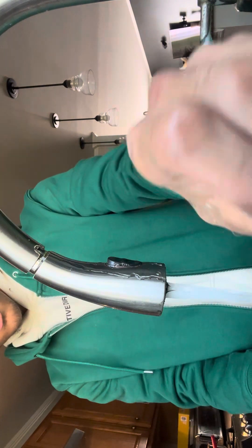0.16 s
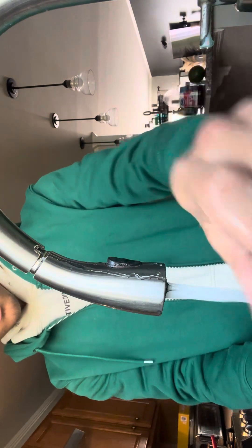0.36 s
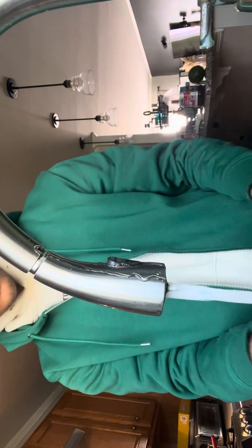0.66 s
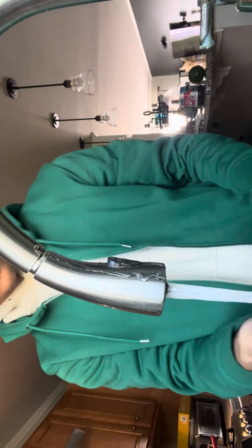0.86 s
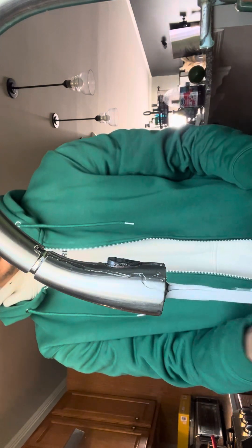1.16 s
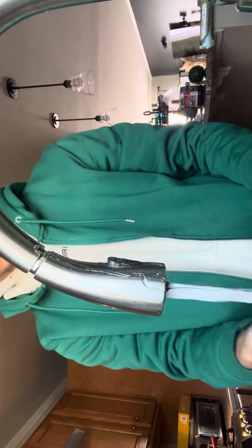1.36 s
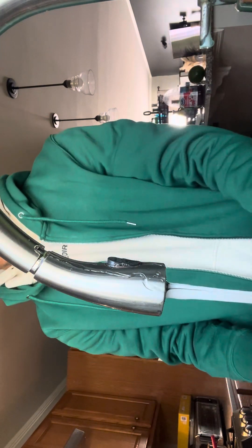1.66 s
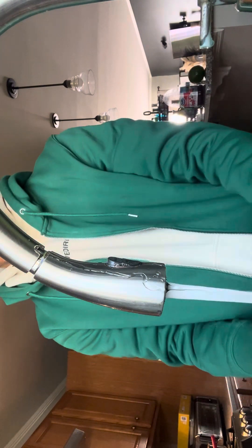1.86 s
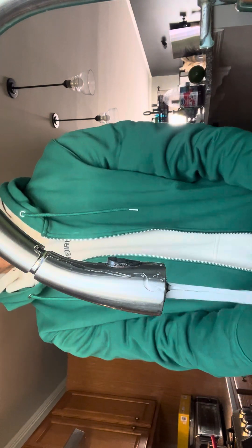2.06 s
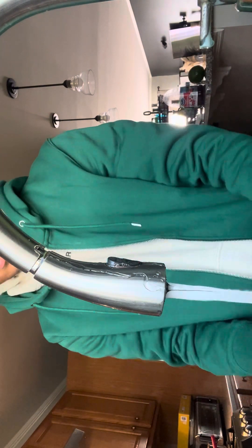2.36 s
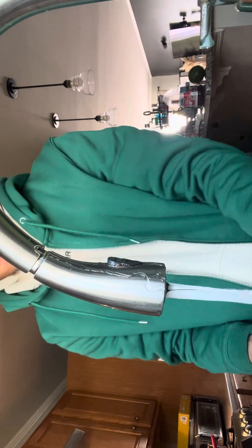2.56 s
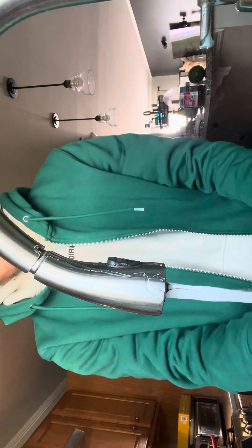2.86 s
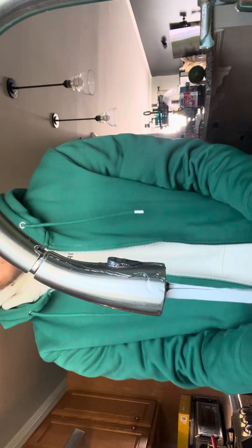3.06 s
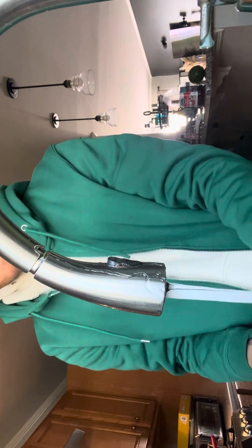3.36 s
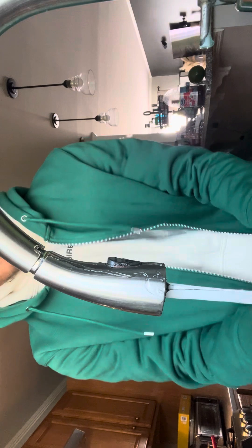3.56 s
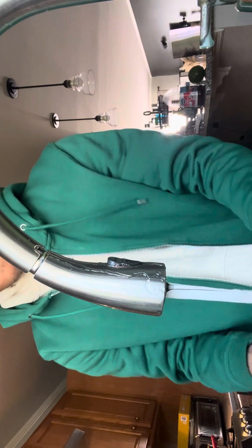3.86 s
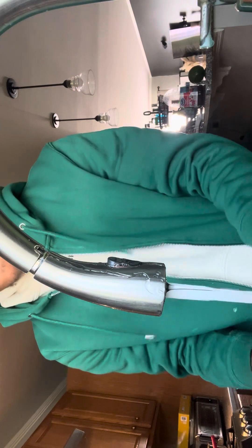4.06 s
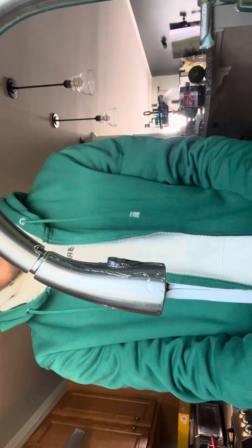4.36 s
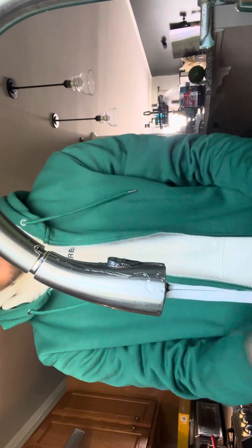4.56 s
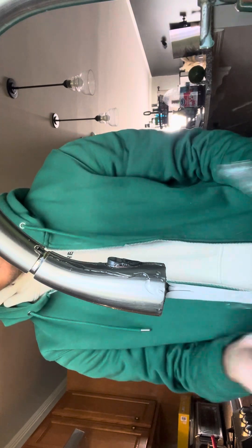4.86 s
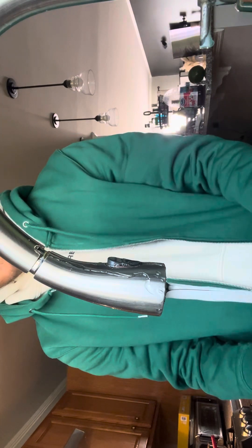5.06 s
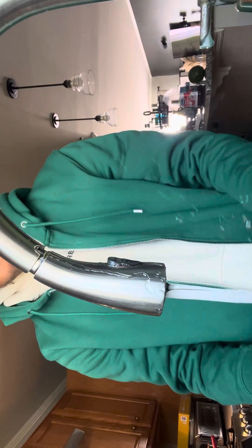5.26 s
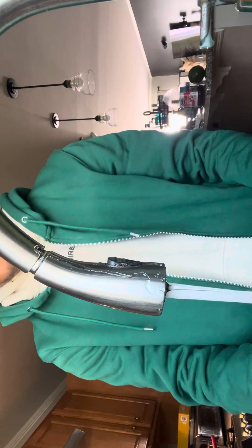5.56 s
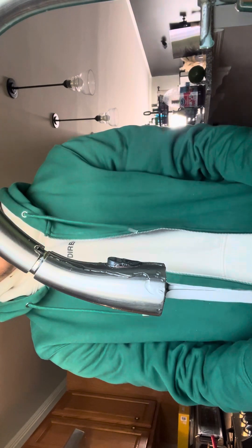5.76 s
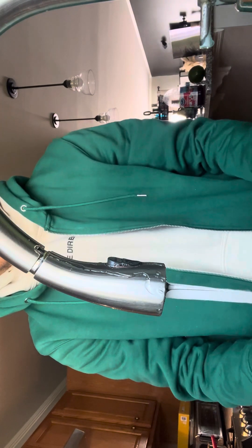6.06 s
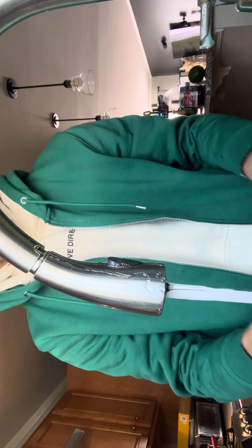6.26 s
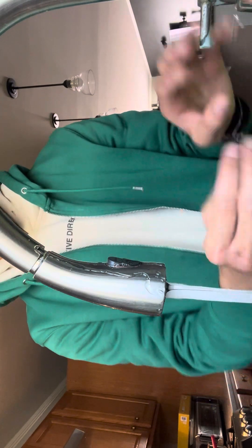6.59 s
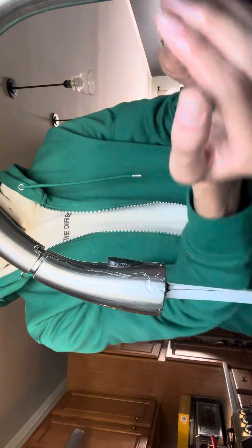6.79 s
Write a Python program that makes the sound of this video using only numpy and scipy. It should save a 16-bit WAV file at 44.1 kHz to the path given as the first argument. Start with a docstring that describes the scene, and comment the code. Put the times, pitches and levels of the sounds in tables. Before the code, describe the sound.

Close, crisp tap water patters and fizzes on a metal basin, broken by hand splashes, watery plops and dull hollow thumps midway.

```python
"""In a kitchen, a tap runs into a steel sink while hands are rubbed under it.
The stream patters, fizzes and drums on the basin: random impacts drive bands, air bubbles and steel modes.
The hands throw off splashes and let go gulps of water that thump on the bottom: timed bursts and rings.
Two microphone ports listen from beside the spout, over a low room rumble."""
import sys
import numpy as np
from scipy import signal
from scipy.fft import rfft, irfft, next_fast_len
from scipy.io import wavfile

SR = 44100
rng = np.random.default_rng(int(sys.argv[2]) if len(sys.argv) > 2 else 0)


def waveform_to_disk(signal):
    """Save audio, clipped to [-1, 1], as 16-bit WAV at the path in sys.argv[1]."""
    frames = np.transpose(np.atleast_2d(signal))
    scaled = np.clip(frames, -1, 1) * 32767
    samples = np.round(scaled).astype(np.int16)
    wavfile.write(sys.argv[1], SR, samples)


N = 305613
TIME = np.arange(N) / SR
FFT_SIZE = next_fast_len(N + 4096)
DIRECT_ONLY = np.array([[1], [0]])   # layers have two rows: direct sound, scattered sound


def from_db(db):
    """Decibels to gain."""
    return 10 ** (np.asarray(db) / 20)


def rms_one(x):
    """Scale to unit power."""
    return x / np.sqrt(np.mean(x ** 2) + 1e-20)


def on_bins(rows):
    """Read each column of a table by frequency at every FFT bin, along a log frequency axis."""
    hz, *columns = np.transpose(rows)
    bins = np.log(np.maximum(np.fft.rfftfreq(FFT_SIZE, 1 / SR), 1))
    return [np.interp(bins, np.log(hz), column) for column in columns]


def colour(x, spectrum):
    """Shape a signal with a smooth spectrum; rms 1."""
    gain = from_db(on_bins(spectrum)[0])
    return rms_one(irfft(rfft(x, FFT_SIZE) * gain, FFT_SIZE)[..., :N])


def droplets(per_s, spread_db):
    """Two unrelated trains of uneven impacts: one heard directly, one scattered round the basin."""
    sizes = from_db(spread_db * np.minimum(rng.exponential(1, (2, N)), 4.5))
    signs = rng.choice([-1, 1], (2, N))
    landed = rng.random((2, N)) < per_s / SR
    return rms_one(sizes * signs * landed)


def spurts(per_s, decay_s):
    """Power of clumps of water that land at once and die away; mean 1."""
    landings = (rng.random(N) < per_s / SR) * rng.exponential(1, N) ** 2.45
    power = signal.lfilter([1], [1, -np.exp(-1 / (decay_s * SR))], landings + 1e-18)
    return power / power.mean()


def resonate(x, hz, width_hz):
    """A two-pole resonance with gain 1 on top."""
    r = np.exp(-np.pi * width_hz / SR)
    zeros = np.array([1, 0, -1]) * (1 - r * r) / 2
    poles = [1, -2 * r * np.cos(2 * np.pi * hz / SR), r * r]
    return signal.lfilter(zeros, poles, x + 1e-18)


def basin(x, modes):
    """Impacts ring a set of modes in parallel, with alternating polarity; rms 1."""
    return rms_one(sum((-1) ** k * from_db(db) * resonate(x, hz, width)
                       for k, (hz, width, db) in enumerate(modes)))


def bursts(rows, rise_s):
    """Envelope of events (time [s], level [dB], decay [s]) that swell quickly and die away."""
    out = np.zeros(N)
    for s, db, decay_s in rows:
        part = out[int(s * SR):][:SR // 2]
        age = TIME[:len(part)]
        part += from_db(db) * (1 - np.exp(-age / rise_s)) * np.exp(-age / decay_s)
    return out


def rings(rows, rise_s, glide=0):
    """Damped sines (time [s], level [dB], pitch [Hz], t60 [s]); glide is the relative pitch rise per second."""
    out = np.zeros(N)
    for s, db, hz, t60 in rows:
        part = out[int(s * SR):][:SR // 2]
        age = TIME[:len(part)]
        swing = np.sin(2 * np.pi * hz * age * (1 + glide * age / 2))
        part += from_db(db - 60 * age / t60) * (1 - np.exp(-age / rise_s)) * swing
    return out


def over_stream(steady_db, gain):
    """Level in dB of the steady stream and an added layer, summed as powers."""
    return 20 * np.log10(np.hypot(from_db(steady_db), gain))


WANDER_PER_S = 18   # new random levels per second


def wander(spread_db):
    """The water lands unevenly: a random swing of level in dB, gliding from value to value."""
    knots = rng.standard_normal(1024)
    return spread_db * np.interp(TIME * WANDER_PER_S, np.arange(len(knots)), knots)


# tone of the room rumble: (frequency [Hz], relative level [dB])
RUMBLE_TONE = [(20, -3), (40, -0.5), (65, 6), (110, -3.5), (200, -8.5), (600, -18), (3000, -50)]
RUMBLE_DB = -52


def room_rumble():
    """The room rumbles steadily: noise weighted to the lows."""
    return from_db(RUMBLE_DB) * colour(rng.standard_normal((2, N)), RUMBLE_TONE)


# rumbles after the heaviest knocks: (time [s], level [dB], decay [s])
CABINET_RUMBLES = [(3.995, -34, 0.053), (4.085, -38.5, 0.074), (4.44, -46, 0.063)]
# their tone: (frequency [Hz], relative level [dB])
CABINET_TONE = [(20, -10), (45, 1), (70, 1), (110, -6), (250, -6.5), (350, -12), (600, -33), (2000, -60)]


def cabinet():
    """A deep, uneven rumble follows the heaviest knocks: bursts of low noise."""
    return bursts(CABINET_RUMBLES, rise_s=.008) * colour(rng.standard_normal((2, N)), CABINET_TONE)


GULPS_PER_S, GULP_DB, GULP_CYCLES = 20, -9.5, 10   # level against the gurgle before its trim


def gulps(level_db, count=10):
    """Pockets of air break one by one in the pool, each ringing at the pitch of its size."""
    born = droplets(per_s=GULPS_PER_S, spread_db=0.0)
    dealt = rng.integers(0, count, N)   # deals each pocket a pitch
    pockets = sum(resonate(born * (dealt == k), hz, hz / GULP_CYCLES)
                  for k, hz in enumerate(np.geomspace(430, 640, count)))
    return from_db(level_db + GULP_DB) * rms_one(pockets)


# mid modes of the steel, air pockets in the pooled water, low modes of the bottom:
# (frequency [Hz], width [Hz], relative level [dB])
RING_MODES = [(818, 106, -3.5), (1003, 200, -4), (1098, 104, 2.5), (1240, 68, 4), (1612, 46, 6.5),
              (1734, 37, 8), (1960.5, 36, 8.5), (2103, 7.5, 8), (2278, 21, 3.5)]
POCKET_MODES = [(418, 41, -3.5), (517.4, 24, -1), (581, 18.5, 3), (707, 11.7, 0), (1070, 310, -12)]
DRUM_MODES = [(59.3, 28, -8), (90.7, 16, -0.5), (122, 10, 7), (168.5, 11.4, 0.5), (234.4, 32.6, -3.5),
              (325.4, 21, -7.5), (398, 55, -12)]


def drumming(ring_db, gurgle_db, drum_db):
    """The falling water keeps the basin ringing and rumbling; lumps of water make the pool gurgle."""
    ring = from_db(ring_db + 2.0) * basin(droplets(per_s=900, spread_db=1.5), RING_MODES)
    gurgle = from_db(gurgle_db - 1.5) * basin(droplets(per_s=300, spread_db=3.0), POCKET_MODES)
    drum = from_db(drum_db - 3.5) * basin(droplets(per_s=600, spread_db=3.5), DRUM_MODES)
    return ring + gurgle + gulps(gurgle_db) + drum


# large air pockets: (time [s], level before trim [dB], starting pitch [Hz])
PLOPS = [(3.287, -27.5, 513), (3.436, -30, 550), (3.491, -27.5, 520), (3.626, -25, 530), (4.503, -36, 500),
         (5.408, -28.5, 506), (5.493, -37, 493), (5.508, -42, 540), (5.642, -31.5, 517), (5.797, -34, 515)]
PLOP_T60_S, PLOP_GLIDE_PER_S = .042, 2.0
CHURN_DB, CHURN_HZ, CHURN_WIDTH_HZ = -8.5, 520, 126   # level against the untrimmed plop
# handfuls of water that slop into the pool: (time [s], level [dB], decay [s])
SLOPS = [(1.035, -41, 0.058), (1.088, -45, .015), (3.289, -50, 0.013), (3.764, -46, .02),
         (5.782, -38, 0.039), (5.835, -56, 0.027), (6.097, -40, 0.035), (6.825, -43, 0.024),
         (6.901, -37.5, 0.033)]
# dull wash of the slopping water: (frequency [Hz], relative level [dB])
WASH_TONE = [(150, -11), (400, 1), (560, 2), (680, -6.5), (850, 1), (1150, -3), (1450, -2), (4000, -32)]


def pool():
    """Water slops into the pool; trapped air plops, rising in pitch, inside a churn of smaller pockets."""
    plops = rings([(s, db, hz, PLOP_T60_S) for s, db, hz in PLOPS], rise_s=0.0056, glide=PLOP_GLIDE_PER_S)
    small_pockets = colour(droplets(per_s=900, spread_db=2.0), WASH_TONE)
    churn = rms_one(resonate(small_pockets, CHURN_HZ, CHURN_WIDTH_HZ))
    churning = bursts([(s, db + CHURN_DB, .014) for s, db, hz in PLOPS], rise_s=0.0053)
    washing = bursts(SLOPS, rise_s=0.0028) * colour(droplets(per_s=1500, spread_db=1.5), WASH_TONE)
    return from_db(4.0) * plops * DIRECT_ONLY + churning * churn + washing


# single fat drops on the steel: (time [s], level before ping trim [dB], starting pitch [Hz])
DROPS = [(0.686, -22.5, 1202), (1.215, -16, 1234), (1.519, -7.5, 1240), (1.534, -13, 1190),
         (1.875, -24.5, 1200), (3.308, -25, 1360), (3.436, -23, 1250), (3.737, -21, 1160),
         (6.097, -23, 1275)]
SPATTER_DB, SPATTER_DECAY_S, SPATTER_WIDTH_HZ = -12, 0.012, 320   # level against the untrimmed drop
DROP_PLOP_DB, DROP_PLOP_HZ, DROP_PLOP_WIDTH_HZ = -18, 593, 200   # dull plop within the spatter


def fat_drops(t60=0.051):
    """Fat drops ping on the steel, rising in pitch, and burst into spatter that rings near that pitch."""
    pings = rings([(s, db, hz, t60) for s, db, hz in DROPS], rise_s=0.0023, glide=4.8)
    train = droplets(per_s=4400, spread_db=-2.5)
    plop_train = droplets(per_s=1500, spread_db=-4.0)
    plop = from_db(DROP_PLOP_DB) * rms_one(resonate(plop_train, DROP_PLOP_HZ, DROP_PLOP_WIDTH_HZ))
    spatter = 0
    for s, db, hz in DROPS:
        once = resonate(train, hz, SPATTER_WIDTH_HZ)
        pitched = rms_one(resonate(once, hz, SPATTER_WIDTH_HZ))
        spatter = spatter + bursts([(s, db + SPATTER_DB, SPATTER_DECAY_S)], rise_s=0.0098) * (pitched + plop)
    return spatter + from_db(-6.5) * pings * DIRECT_ONLY


# gulps of water and knocks on the basin:
# (time [s], boom level [dB], boom pitch [Hz], boom t60 [s], slap level [dB])
THUMPS = [(1.531, -31, 125, .08, -38), (1.547, -25, 122, 0.26, -38), (1.545, -36, 58.6, 0.23, -41),
          (3.376, -32, 147, 0.19, -43), (3.436, -33, 135, 0.16, -49), (3.963, -23, 240, 0.069, -28),
          (3.972, -44, 725, 0.17, -45), (3.984, -15.5, 96.3, 0.13, -36.5), (4.041, -41, 288, 0.28, -41.5),
          (4.076, -31.5, 65.4, 0.47, -48), (4.234, -33, 132.5, .25, -50), (4.262, -37, 200, .2, -44),
          (4.381, -35, 1070, 0.06, -39), (4.388, -33, 201, .1, -34), (4.396, -29, 742, 0.066, -44),
          (4.438, -35, 90, 0.25, -47), (6.823, -33, 500, 0.054, -40), (6.9, -27, 460, 0.049, -40)]
# hollow body of the basin: (frequency [Hz], level against the slap [dB], t60 [s])
BODY_MODES = [(122, -13.5, 0.43), (249, -16, 0.52), (332.4, -4, 0.12), (490, -21, 0.36), (672, -7.5, 0.23),
              (788, -12, 0.36)]


def thumps(slap_s=0.02):
    """Heavy blows slap the basin wetly, make the bottom boom and ring its hollow body."""
    booms = rings([row[:4] for row in THUMPS], rise_s=0.0011)
    body = rings([(s, slap_db + db, hz, t60) for s, *_, slap_db in THUMPS for hz, db, t60 in BODY_MODES],
                 rise_s=.003)
    slap_tone = [(60, -4), (170, 6.0), (320, 13.5), (600, 3.0), (1100, 3), (1700, -24), (6000, -33)]
    wet = colour(droplets(per_s=1900, spread_db=-1.0), slap_tone)
    slaps = wet * bursts([(s, slap_db, slap_s) for s, *_, slap_db in THUMPS], rise_s=0.0059)
    return slaps + (booms + body) * DIRECT_ONLY


# tone of the small bubbles: (frequency [Hz], relative level [dB])
BUBBLE_TONE = [(1800, -13), (2400, 6), (2750, 11.5), (3500, 3.5), (4500, 5), (6000, -7.5), (8000, -41)]


def bubbling(level_db, cycles=30, count=44):
    """Trapped air rings for a few cycles, each bubble at one of many pitches."""
    born = droplets(per_s=550, spread_db=1.5)
    dealt = rng.integers(0, count, N)   # deals each bubble a pitch
    fizz = sum(resonate(born * (dealt == k), hz, hz / cycles) / np.sqrt(hz)
               for k, hz in enumerate(np.geomspace(1900, 7500, count)))
    return from_db(level_db - 2.5) * colour(fizz, BUBBLE_TONE)


# large single bubbles: (time [s], level before trims [dB], starting pitch [Hz])
BLIPS = [(1.527, -34, 3580), (3.422, -38, 3820), (3.497, -40, 4000), (4.497, -34, 2090), (4.514, -36, 1730),
         (4.52, -37, 2200), (5.001, -39, 4400), (5.02, -40.5, 2080), (5.028, -41, 2350), (5.052, -42, 3410),
         (5.089, -49, 2640), (5.122, -37, 3620), (5.425, -37, 2340), (6.199, -33, 2360), (6.386, -43, 3520),
         (6.637, -46, 3670), (6.767, -40.5, 3460)]


def blips(t60=0.077):
    """Large bubbles chirp upward as they reach the surface, and break with a little fizz."""
    chirps = rings([(s, db, hz, t60) for s, db, hz in BLIPS], rise_s=0.00026, glide=0.99)
    breaking = bursts([(s, db, .008) for s, db, hz in BLIPS], rise_s=0.00057)
    fizz = colour(droplets(per_s=23000, spread_db=-2.0), BUBBLE_TONE) * breaking
    return from_db(12.5) * chirps * DIRECT_ONLY + from_db(3.5) * fizz


# lone drops that snap on bare steel: (time [s], level [dB], pitch [Hz])
SNAPS = [(1.5275, -11.5, 3650), (1.5105, -21, 4140), (1.538, -15, 3730), (2.314, -20, 6440),
         (2.3254, -11.5, 6170), (4.917, -16, 6500), (4.9045, -21, 6300), (4.979, -24, 5200),
         (5.0035, -21, 4330), (5.055, -20, 3600), (5.075, -18, 6300), (5.123, -11, 3700),
         (5.5727, -12.5, 6400), (5.8, -11.5, 6100), (6.405, -7, 6560), (6.521, -20, 3670),
         (.0635, -16, 6200), (.384, -23, 6300), (3.933, -22, 4700), (6.558, -13, 6600), (6.659, -13, 6500),
         (6.879, -20, 6200)]
SNAP_T60_S = 0.0074
CRACKLE_DB, CRACKLE_PER_S = -5.5, 230   # small random snaps, level against the spray before its trim
# tone of coarse drops: (frequency [Hz], relative level [dB])
SHOWER_TONE = [(150, -14), (700, -25), (2300, -3), (3500, -8.5), (5000, -4), (6500, 2), (7300, 4.5),
               (8600, -2), (10000, -34), (12000, -3), (15800, -29)]


def crackle(level_db, cycles=13, count=18):
    """Single drops snap on the steel with a brief pitched ring: a few loud ones, many small."""
    born = droplets(per_s=CRACKLE_PER_S, spread_db=2.0)
    dealt = rng.integers(0, count, N)   # deals each snap a pitch
    small = sum(resonate(born * (dealt == k), hz, hz / cycles) / hz
                for k, hz in enumerate(np.geomspace(3100, 7000, count)))
    loud = rings([(s, db, hz, SNAP_T60_S) for s, db, hz in SNAPS], rise_s=0.00031)
    return from_db(level_db + CRACKLE_DB) * colour(small, SHOWER_TONE) + loud * DIRECT_ONLY


# water flung off the hands: (time [s], level before trim [dB])
SPLASHES = [(.062, -27.5), (0.114, -19), (.143, -33), (0.178, -19.5), (0.195, -21), (0.232, -20),
            (0.334, -18), (0.354, -19), (.381, -20), (.407, -26), (.665, -26), (.758, -23), (0.878, -28),
            (1.128, -19), (1.268, -22.5), (1.302, -19.5), (1.462, -16), (1.509, -16.5), (1.5269, -18),
            (1.623, -25), (1.767, -22.5), (1.935, -32), (1.966, -22), (2.029, -17.5), (2.054, -22.5),
            (2.324, -16.5), (2.398, -19), (2.782, -24), (2.829, -19.5), (3.143, -22), (3.16, -31),
            (3.23, -25), (3.423, -24), (3.54, -19.5), (3.6, -25), (3.831, -25), (3.877, -18.5), (3.92, -27),
            (4.262, -15), (4.277, -24), (4.382, -24), (4.543, -17), (4.582, -21), (4.9055, -20.5),
            (4.914, -15), (4.9776, -19), (5.0025, -19.5), (5.053, -32), (5.13, -33), (5.277, -26),
            (5.388, -24), (5.408, -17), (5.485, -24), (5.499, -20.5), (5.57, -20), (5.605, -23),
            (5.656, -22), (5.672, -19), (5.731, -22.5), (5.79, -22.5), (5.899, -24), (5.931, -24),
            (5.962, -21), (5.988, -20), (6.015, -21), (6.059, -19.5), (6.095, -27), (6.108, -22),
            (6.152, -18), (6.2, -21), (6.217, -21), (6.306, -22.5), (6.385, -13.5), (6.518, -17),
            (6.54, -21), (6.555, -23), (6.637, -16.5), (6.654, -24), (6.72, -22), (6.73, -20), (6.765, -23),
            (6.805, -18), (6.84, -20)]
SPLASH_DECAY_S = 0.0091
# bright resonances of the basin and spout: (frequency [Hz], width [Hz], relative level [dB])
BRIGHT_MODES = [(3436, 32, 16), (3580, 230, 9.5), (4580, 280, 7.5), (6190, 410, 14.5), (6400, 78, 5)]


def splashes():
    """A sheet of water bursts into a short, dense shower that sets the bright resonances ringing."""
    shower = colour(droplets(per_s=7000, spread_db=1.5), SHOWER_TONE)
    ringing = basin(droplets(per_s=9000, spread_db=7.5), BRIGHT_MODES)
    flung = bursts([(s, db, SPLASH_DECAY_S) for s, db in SPLASHES], rise_s=0.0019)
    return from_db(-7) * flung * (shower + from_db(-4.0) * ringing)


# tone of the droplet impacts: (frequency [Hz], relative level [dB])
SPRAY_TONE = [(150, -16.5), (700, -13), (1500, -17.5), (2400, -10.5), (3500, -1.5), (4700, -4), (5600, 0),
              (6400, 0), (7200, 2.5), (8500, -34), (10000, -2.5), (12000, -2), (14000, -7.5), (15800, -8)]
PATTER_EVEN, MIST_EVEN = 0.2, 0.42   # share of power that lands evenly: droplets, finest mist


def spray(level_db):
    """Droplets patter over the steady hiss of the aerator; each drop size, a band, lands in its own spurts."""
    clumps = spurts(per_s=330, decay_s=0.006)   # drives the bright ringing
    patter, edges = 0, [100, 2200, 3800, 5600, 8500, 19000]   # band edges in Hz
    for low, high in zip(edges, edges[1:]):
        bandpass = signal.butter(2, [low, high], "band", fs=SR, output="sos")
        band = signal.sosfilt(bandpass, droplets(per_s=4200, spread_db=1.5))
        even = MIST_EVEN if high == edges[-1] else PATTER_EVEN
        patter = patter + band * np.sqrt(even + (1 - even) * spurts(per_s=330, decay_s=0.0081))
    ringing = basin(droplets(per_s=7500, spread_db=-1.5) * np.sqrt(clumps), BRIGHT_MODES)
    patter = colour(patter, SPRAY_TONE) + from_db(-8) * ringing
    hiss = from_db(-48.5) * colour(rng.standard_normal((2, N)), SPRAY_TONE)
    return from_db(level_db + 1.5) * rms_one(patter) + hiss


# the hands pass through the stream, levels before the layer trims: (time [s], swell [s], hold [s],
# spray level [dB], bubbling level [dB], level of the water shed on the basin [dB])
STROKES = [(0.0, 0.0051, 0.46, -62, -44, -51), (0.583, 0.081, 0.024, -33.5, -31.5, -66),
           (0.974, 0.14, .03, -36, -33.5, -45), (1.19, 0.014, 0.034, -41, -41, -113),
           (1.495, 0.019, 0.024, -29.5, -27.5, -33), (1.872, 0.058, 0.11, -36, -39, -41.5),
           (2.267, 0.11, 0.089, -34, -45, -47), (2.72, 0.071, 0.04, -34, -42, -40.5),
           (3.096, 0.035, 0.096, -37, -45, -45), (3.37, 0.042, 0.18, -38, -41.5, -45),
           (3.742, 0.078, 0.004, -36.5, -65, -53), (3.9, .018, 0.016, -34, -34.5, -57),
           (4.214, 0.034, 0.11, -36.5, -43, -48), (4.37, 0.17, 0.037, -32.5, -30.5, -66),
           (4.892, 0.011, 0.031, -35, -35.5, -36), (4.944, 0.054, 0.12, -32.5, -40, -41.5),
           (5.379, 0.0091, 0.012, -34, -31, -40), (5.468, 0.019, 0.0092, -38, -41, -41),
           (5.751, 0.023, 0.011, -37.5, -57, -43.5), (6.03, 0.036, 0.036, -42, -59, -54),
           (6.528, 0.087, 0.13, -39, -57, -64)]
STROKE_EBB_S = 0.065   # time constant of the water running off the hands


def strokes():
    """Each pass of the hands swells, holds and ebbs: gains of its spray, bubbling and shed water."""
    power = np.zeros((3, N))
    for s, swell_s, hold_s, *levels_db in STROKES:
        swell = np.clip((TIME - s) / swell_s, 0, 1)
        ebb = np.exp(-np.maximum(TIME - s - swell_s - hold_s, 0) / STROKE_EBB_S)
        power += np.outer(from_db(levels_db), swell * ebb) ** 2
    return np.sqrt(power)


def kitchen(x, t60=0.024):
    """The basin walls and the room add a short, diffuse tail: convolution with decaying noise."""
    age = TIME[:SR // 3]
    tail = rng.standard_normal((2, len(age))) * from_db(-60 * age / t60) * (age > .004)
    tail /= np.sqrt(np.sum(tail ** 2, axis=1, keepdims=True))
    return x + from_db(-15) * signal.fftconvolve(x, tail, axes=1)[:, :N]


# the two ports: (frequency [Hz], left lead [rad], likeness [0-1], left minus right level [dB])
PORTS = [(150, 0, .998, 0), (400, -.2, .93, 2), (750, -.6, .75, 5), (1080, -.6, .72, 4),
         (1280, -2.4, .85, 5), (1500, -2.8, .7, 3), (1800, -2.7, .8, 1.5), (1970, -2, .25, 0),
         (2200, -2.3, .65, 0), (2550, -2.9, .78, 1), (2900, -2.9, .82, 2.5), (3300, 0, .42, 1),
         (4400, -.5, .45, -2), (5000, 1.1, .45, -1.5), (6200, 1.1, .86, 0), (7300, 2, .8, 0),
         (8300, 3.05, .985, 0), (10000, 3.15, .99, 0), (11500, 4.6, .7, 0), (12700, 6.28, .98, 0)]


def ports(x):
    """The direct sound reaches the two ports out of step; the scattered sound sets them apart."""
    direct, scattered = rfft(x, FFT_SIZE)
    lead, alike, balance_db = on_bins(PORTS)
    alike = np.clip(alike, 0, .999)
    common = np.sqrt((1 + alike) / 2) * direct
    apart = np.sqrt((1 - alike) / 2) * scattered
    left = (common + apart) * from_db(balance_db / 2)
    right = (common - apart) * from_db(-balance_db / 2) * np.exp(-1j * lead)
    return irfft(np.array([left, right]), FFT_SIZE)[:, :N]


# spray of the stream as it falls past the hands: (time [s], level before trim [dB])
STREAM_CURVE = [(0, -35), (.38, -37.5), (.55, -40), (.92, -41), (1.7, -39), (1.86, -43), (2.2, -42),
                (2.66, -43.5), (3.06, -42.5), (3.67, -42), (4.15, -43.5), (4.8, -44.5), (5.35, -46),
                (5.53, -38.5), (6.93, -37)]
# drumming on the bottom, weaker while the hands catch the stream: (time [s], level before trim [dB])
DRUM_CURVE = [(0, -40.5), (.3, -53), (.65, -44.5), (1.4, -42.5), (2.4, -46.5), (3.2, -46), (4.2, -42.5),
              (4.8, -45), (5.65, -50), (6.7, -50), (6.93, -39.5)]
FIZZ_DB, RING_DB, GURGLE_DB = -46, -48.5, -54   # kept going by the bare stream, before trims
FIZZ_WANDER_DB, RING_WANDER_DB, GURGLE_WANDER_DB = 2, 3.5, 3.5   # spread of the random level swings
STROKE_RING_DB, STROKE_GURGLE_DB = -20, -8.5   # ring against stroke spray, gurgle against shed water
SHUDDER_DB, SHUDDER_RING_DB, SHUDDER_S = -2.5, -11.5, 0.023   # drum and ring against the slap; decay


def scene():
    """The hands stir up the stream; splashes and basin sound over the rumble of the room."""
    thrown, churned, shed = strokes()
    stream_db, drum_db = [np.interp(TIME, *np.transpose(curve)) for curve in (STREAM_CURVE, DRUM_CURVE)]
    # after a thump the basin shudders and rings
    shudder = bursts([(s, slap_db, SHUDDER_S) for s, *_, slap_db in THUMPS], rise_s=0.0044)
    added_ring = np.hypot(from_db(STROKE_RING_DB) * thrown, from_db(SHUDDER_RING_DB) * shudder)
    added_drum = np.hypot(shed, from_db(SHUDDER_DB) * shudder)
    ring_db = over_stream(RING_DB, added_ring) + wander(RING_WANDER_DB)
    gurgle_db = over_stream(GURGLE_DB, from_db(STROKE_GURGLE_DB) * shed) + wander(GURGLE_WANDER_DB)
    steel = cabinet() + drumming(ring_db, gurgle_db, over_stream(drum_db, added_drum))
    steel = steel + pool() + fat_drops() + thumps()
    fizz_db = over_stream(FIZZ_DB, churned) + wander(FIZZ_WANDER_DB)
    spray_db = over_stream(stream_db, thrown)
    water = bubbling(fizz_db) + blips() + crackle(spray_db) + splashes() + spray(spray_db)
    return ports(kitchen(water + steel) + room_rumble())


def record(dry):
    """The deepest rumble is rolled off below 30 Hz and the top is cut steeply above 15.75 kHz."""
    dry = signal.sosfilt(signal.butter(2, 30, "high", fs=SR, output="sos"), dry)
    return signal.sosfilt(signal.ellip(12, .1, 90, 15750, fs=SR, output="sos"), dry)


dry = scene()
out = record(dry)
waveform_to_disk(out)
```